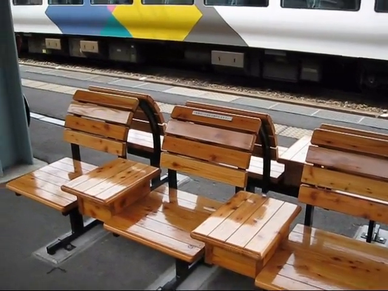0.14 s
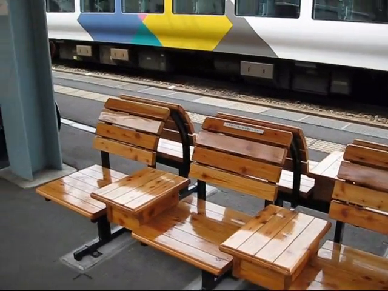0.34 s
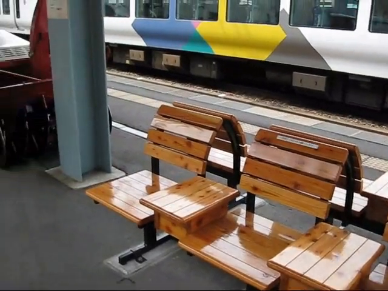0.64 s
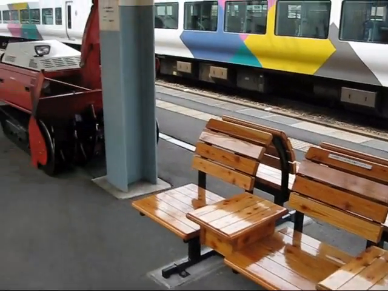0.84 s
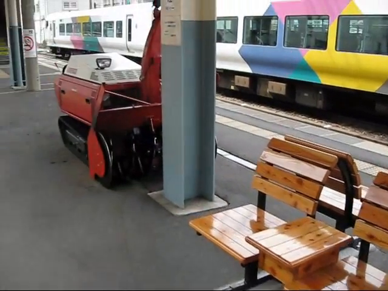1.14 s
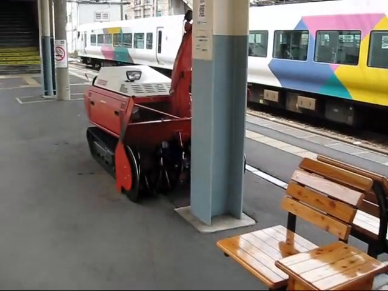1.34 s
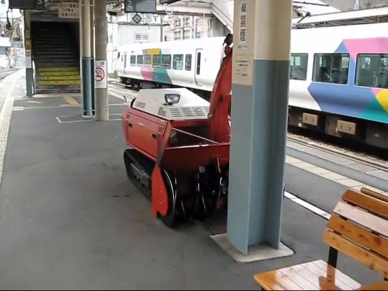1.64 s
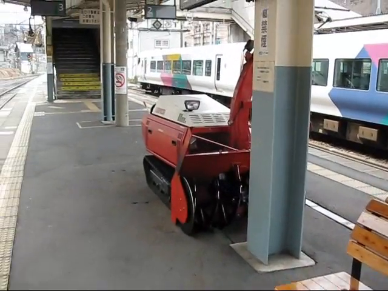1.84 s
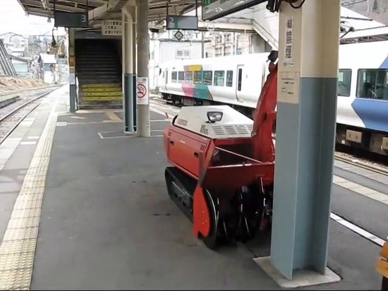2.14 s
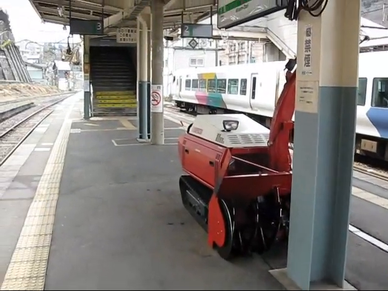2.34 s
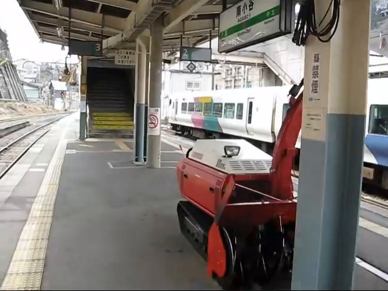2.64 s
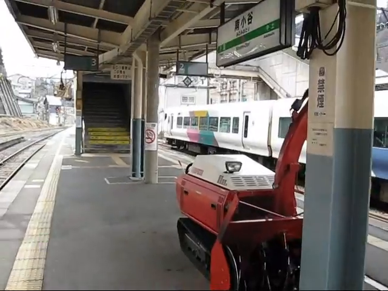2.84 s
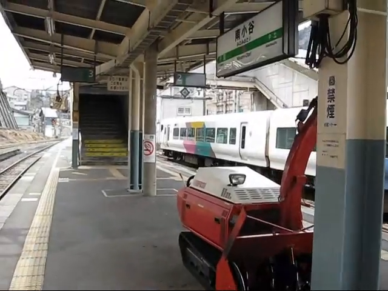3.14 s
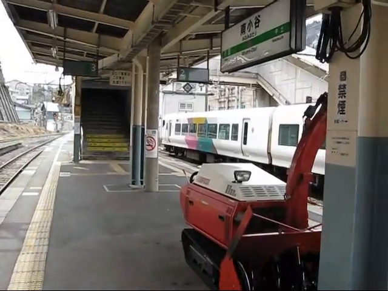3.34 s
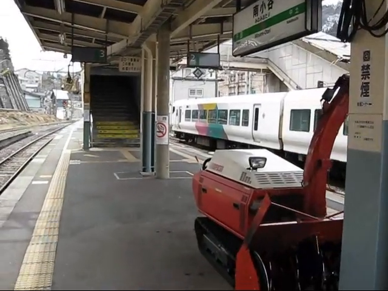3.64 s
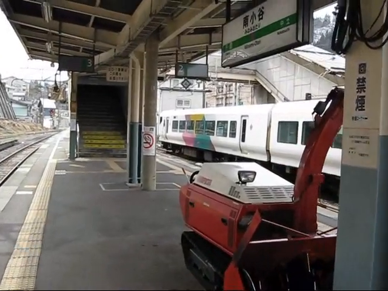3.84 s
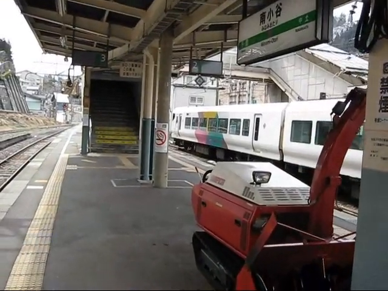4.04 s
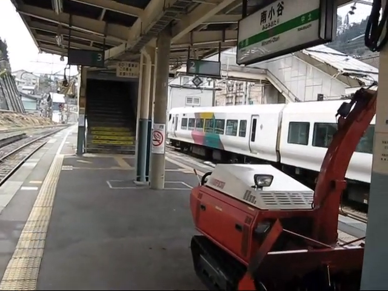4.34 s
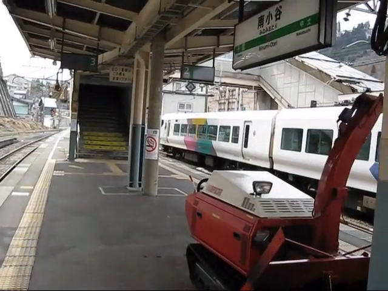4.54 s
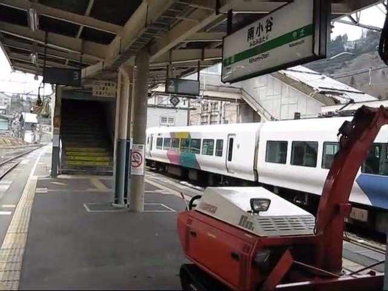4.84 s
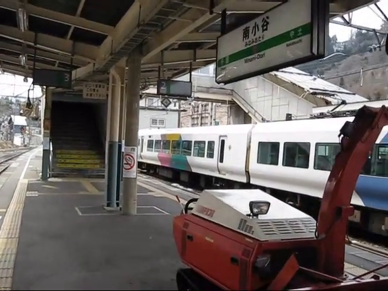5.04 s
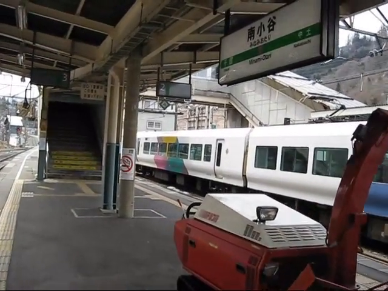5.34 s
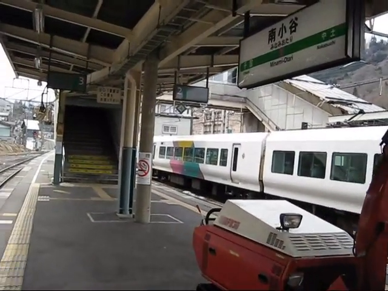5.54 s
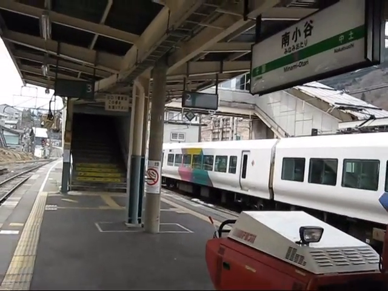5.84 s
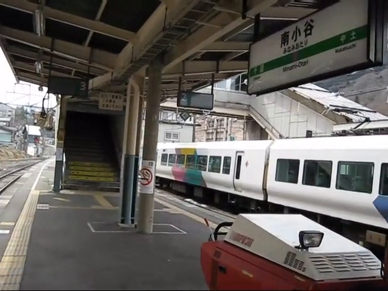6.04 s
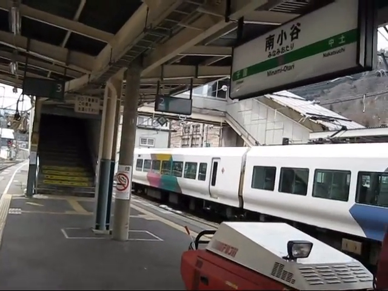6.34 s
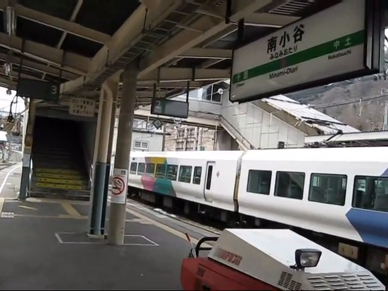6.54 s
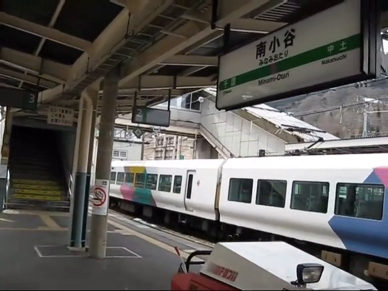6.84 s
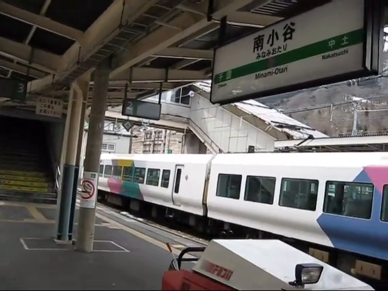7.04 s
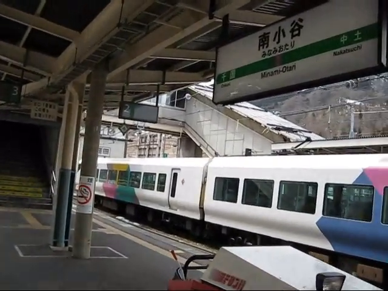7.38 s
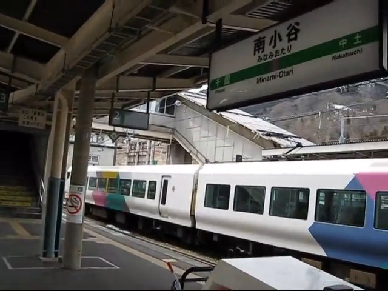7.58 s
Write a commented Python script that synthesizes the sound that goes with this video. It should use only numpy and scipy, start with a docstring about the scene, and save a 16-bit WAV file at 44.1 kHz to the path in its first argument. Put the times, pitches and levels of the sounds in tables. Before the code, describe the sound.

An electric train stands at a roofed open-air platform, its equipment running throughout. A piercing whine around three kilohertz flutters and swells irregularly, over a pulsing low hum and broad rushing blower air. Faint bird twitters come and go far away. A small handheld camera slowly turns from the nearest car, slightly dulling the sound and adding two barely audible ticks.

```python
"""A beating electric hum and whine stands over the roar of cooling blowers, with faint birds far off.
An electric train waits at a roofed platform; a small camera slowly turns away from its nearest car.
Converters under several cars sound sine tones and narrow humps near multiples of the mains, out of step.
Shaped noise gives blower air, blade tones and distant rumble; short falling notes with echoes give
the birds; brief high rings give faint ticks in the camera body."""
import sys
import numpy as np
from scipy import signal
from scipy.fft import rfft, irfft
from scipy.io import wavfile
from scipy.ndimage import uniform_filter1d

SR = 44100
rng = np.random.default_rng(int(sys.argv[2]) if len(sys.argv) > 2 else 0)


def waveform_to_disk(signal):
    """Save audio, clipped to [-1, 1], as 16-bit WAV at the path in sys.argv[1]."""
    frames = np.transpose(np.atleast_2d(signal))
    scaled = np.clip(frames, -1, 1) * 32767
    samples = np.round(scaled).astype(np.int16)
    wavfile.write(sys.argv[1], SR, samples)


N = 340002
T = np.arange(N) / SR
MAINS_HZ = 60


def undb(db):
    """Turn decibels into an amplitude factor."""
    return 10 ** (np.asarray(db) / 20)


def walk(rate_hz):
    """Smooth random drift: levels held 1 / rate_hz seconds and slewed twice, spread about 0.7."""
    hold = int(SR / rate_hz)
    steps = np.repeat(rng.standard_normal(N // hold + 1), hold)
    slewed = uniform_filter1d(uniform_filter1d(steps, hold), hold)
    return 0.97 * slewed[:N]


def coloured(gain):
    """Noise whose amplitude density (per root Hz) follows gain(hz)."""
    hz = np.arange(1, N // 2 + 2) * SR / N
    white = rfft(rng.standard_normal(N))
    return irfft(white * gain(hz) * np.sqrt(SR / 2), N)


def loud_tones(orders, table, wander, partner=0., partner_hz=4.):
    """Swelling tones of wandering pitch; a second car a few Hz above beats against each one."""
    time_s, *levels_db = np.transpose(table)
    out = 0
    for order, level_db in zip(orders, levels_db):
        pitch_hz = order * MAINS_HZ * (1 + wander * walk(3))
        turns = np.cumsum(pitch_hz) / SR + rng.random()
        apart = np.cumsum(partner_hz * (1 + .4 * walk(1.6))) / SR + rng.random()
        pair = np.sin(2 * np.pi * turns) + partner * np.sin(2 * np.pi * (turns + apart))
        # the pair together has the rms level of the table
        swell = np.sqrt(2 / (1 + partner ** 2)) * np.interp(T, time_s, undb(level_db))
        out = out + swell * pair
    return out


# Loudest whine, swelling and fading as the cars beat.
# WHINE_ORDERS: order [mains multiples]; WHINE: time_s [s], then a level_db [dB rms] for each order
WHINE_ORDERS = [52, 56]
WHINE = [(0.0, -47, -37), (0.08, -44, -37), (0.4, -41, -44), (0.52, -41, -45), (0.64, -43, -60),
         (0.92, -53, -40), (1.08, -48, -41), (1.24, -50, -47), (1.52, -49, -46), (1.64, -52, -49),
         (1.8, -43, -44), (2.0, -49, -50), (2.28, -47, -60), (2.36, -62, -43), (2.48, -41, -37),
         (2.56, -40, -46), (2.6, -44, -48), (2.68, -52, -37), (2.8, -42, -47), (2.88, -44, -59),
         (2.96, -41, -42), (3.04, -50, -53), (3.12, -43, -50), (3.24, -60, -47), (3.36, -40, -54),
         (3.44, -54, -44), (3.56, -44, -50), (3.68, -47, -39), (3.76, -55, -43), (3.84, -46, -47),
         (3.92, -60, -56), (3.96, -44, -56), (4.04, -46, -43), (4.12, -62, -47), (4.24, -51, -42),
         (4.36, -62, -46), (4.52, -50, -45), (4.6, -48, -58), (4.68, -49, -38), (4.76, -51, -49),
         (4.84, -43, -46), (4.92, -60, -42), (4.96, -62, -50), (5.04, -40, -52), (5.16, -50, -51),
         (5.24, -45, -52), (5.32, -53, -41), (5.36, -46, -44), (5.44, -56, -51), (5.48, -48, -42),
         (5.56, -46, -51), (5.64, -54, -38), (5.72, -48, -43), (5.76, -48, -38), (5.84, -42, -50),
         (6.04, -49, -40), (6.12, -45, -56), (6.24, -52, -44), (6.32, -40, -47), (6.4, -52, -43),
         (6.48, -44, -60), (6.56, -51, -44), (6.68, -53, -56), (6.72, -43, -45), (6.8, -46, -59),
         (6.84, -46, -45), (6.96, -44, -60), (7.08, -46, -58), (7.2, -43, -40), (7.28, -57, -50),
         (7.36, -43, -39), (7.4, -59, -45), (7.48, -44, -39), (7.56, -46, -51), (7.64, -48, -37),
         (7.7, -46, -42)]
# Side tones of the whine: time_s [s], level_db of multiple 54 [dB rms], level_db of multiple 78 [dB rms]
SIDE = [(0.0, -57, -60), (0.24, -55, -52), (0.6, -49, -66), (0.84, -51, -45), (1.04, -68, -63),
        (1.12, -63, -46), (1.28, -56, -66), (1.36, -68, -51), (1.52, -49, -68), (1.64, -66, -67),
        (1.8, -43, -73), (2.2, -56, -63), (2.32, -46, -59), (2.48, -58, -56), (2.68, -47, -59),
        (2.8, -57, -66), (2.92, -49, -63), (3.12, -67, -73), (3.32, -58, -50), (3.4, -56, -68),
        (3.52, -46, -50), (3.6, -67, -56), (3.76, -48, -56), (3.84, -52, -63), (4.04, -50, -56),
        (4.2, -66, -56), (4.32, -53, -66), (4.72, -50, -54), (4.8, -68, -62), (4.96, -51, -60),
        (5.16, -49, -52), (5.24, -66, -55), (5.32, -45, -60), (5.48, -64, -54), (5.56, -48, -56),
        (5.64, -68, -57), (5.72, -47, -61), (5.8, -56, -66), (5.88, -46, -73), (6.08, -49, -53),
        (6.16, -66, -62), (6.24, -49, -59), (6.4, -61, -63), (6.48, -46, -63), (6.6, -46, -59),
        (6.68, -56, -56), (6.88, -53, -55), (7.04, -68, -57), (7.12, -48, -59), (7.24, -55, -56),
        (7.48, -52, -66), (7.7, -68, -54)]
# Upper side tones: time_s [s], level_db of multiple 82 [dB rms], level_db of multiple 84 [dB rms]
UPPER = [(0, -54, -57), (.36, -56, -50), (.56, -68, -54), (.8, -52, -61), (1.24, -62, -59),
         (1.92, -73, -57.5), (2.28, -56.5, -74), (2.4, -70, -58), (2.64, -60, -56), (2.96, -58, -62),
         (3.48, -64, -57), (3.88, -53, -58), (4.2, -61, -62), (4.64, -53, -61), (4.88, -59, -66),
         (5.28, -61, -66), (5.88, -62, -60), (6.32, -56, -62), (6.52, -56, -59), (7, -57, -59),
         (7.44, -60, -60), (7.7, -56, -57)]


def converter_whine():
    """Strong converter multiples between 3 and 5.1 kHz; the side tones beat with a second car."""
    whine = loud_tones(WHINE_ORDERS, WHINE, wander=.0005)
    whine += loud_tones([54, 78], SIDE, wander=.0004, partner=.15, partner_hz=6.5)
    whine += loud_tones([82, 84], UPPER, wander=.000383, partner=.48, partner_hz=7.)
    return whine


# Slower swells of the low hum.
# HUM_ORDERS: order [mains multiples]; HUM: time_s [s], then a level_db [dB rms] for each order
HUM_ORDERS = [4, 24]
HUM = [(0, -42, -50), (.32, -51, -48.5), (.56, -45, -47.5), (.96, -47, -46), (1.12, -45, -51),
       (1.32, -64, -61), (1.44, -47.5, -64), (1.92, -57, -53), (2.36, -53, -62), (2.76, -54, -50),
       (3.16, -48.5, -68), (3.6, -63, -56), (3.96, -46.5, -55), (4.08, -57, -53.5), (4.96, -60, -50),
       (5.08, -48.5, -56), (5.24, -62, -50), (5.56, -52.5, -47.5), (6.36, -54, -55), (6.56, -47, -62),
       (6.68, -57, -51), (7.24, -54, -53), (7.36, -46.5, -54), (7.7, -62, -50.5)]


def converter_hum():
    """Low mains multiples from two cars, beating about four times a second."""
    return loud_tones(HUM_ORDERS, HUM, wander=.0005, partner=.34, partner_hz=4.)


# How far each car's converter runs off the nominal rate: detune [share of the pitch]
DETUNE = [-.00105, -.0004, .0002, .0007, .0012]
# Weaker converter tones: order [mains multiples], and level_db before the camera's turn [dB rms]
ORDERS = [6, 8, 16, 26, 30, 32, 48, 50, 53, 55, 58, 60, 62, 64, 72, 76, 79, 80, 83, 86, 100, 102, 103, 104,
          106, 108, 110, 112, 114]
ORDERS_DB = [-56, -59, -53, -62, -60, -60, -54, -61, -66, -64, -63, -63, -68, -68, -73, -66, -72, -68, -73,
             -72, -78, -68, -79, -67, -65, -66, -71, -73, -76]
# The same in the high treble: order [mains multiples], and level_db before the turn [dB rms]
HIGH_ORDERS = [126, 128, 130, 132, 134, 136, 156, 162, 164, 166, 170, 180, 182, 210]
HIGH_ORDERS_DB = [-83, -70, -68, -66, -73, -80, -76, -81, -76, -82, -83, -80, -82, -81]


def weak_tones(waver=.00006, blur_hz=.6):
    """Every car sounds each tone with its own strength and a slight waver; the sum beats unevenly."""
    # the other even multiples in the treble sound faintly
    faint_orders = [k for k in range(138, 214, 2) if k not in HIGH_ORDERS]
    orders = ORDERS + HIGH_ORDERS + faint_orders
    levels_db = ORDERS_DB + HIGH_ORDERS_DB + [-87.5] * len(faint_orders)
    spectrum = np.zeros(N // 2 + 1, complex)
    near = np.arange(-40, 41)  # spectrum bins around each tone
    for order, level_db in zip(orders, levels_db):
        # high tones die with distance: the cars furthest off the nominal rate drop out of them
        reach = np.exp(-(np.array(DETUNE) * order * MAINS_HZ / 7) ** 2)
        shares = reach * rng.uniform(0.63, 0.87, len(DETUNE))
        for detune, share in zip(DETUNE, shares / shares.sum()):
            centre = order * MAINS_HZ * (1 + detune) * N / SR
            width = blur_hz * N / SR + waver * centre
            hump = np.exp(-.5 * (near / width) ** 2)
            # random phases spread the waver over time; the hump keeps unit energy
            hump = hump * np.exp(2j * np.pi * rng.random(len(near))) / np.sqrt(np.sum(hump ** 2))
            spectrum[int(centre) + near] += np.sqrt(2 * share) * undb(level_db) * hump * N / 2
    return irfft(spectrum, N)


# Air roar of the blowers before the camera's turn: pitch_hz [Hz], level_db [dB per Hz]
ROAR = [(20, -83.5), (60, -84), (130, -72), (300, -71), (500, -71.5), (800, -71), (1100, -71.5),
        (1500, -74.5), (2500, -76.5), (4000, -83), (5200, -88), (5500, -90.5), (7200, -96.5), (8500, -99),
        (13000, -100)]


def blower_roar():
    """Rushing air: broad noise whose colour runs straight between points on a log pitch scale."""
    pitch_hz, level_db = np.transpose(ROAR)
    return coloured(lambda hz: undb(np.interp(np.log(hz), np.log(pitch_hz), level_db)))


# Blade tones smeared by turbulence, before the turn: pitch_hz [Hz], width_hz [Hz], level_db [dB rms]
BLADES = [(57, 12, -64), (300, 20, -62), (625, 10, -61), (636, 6, -52), (721, 6, -56), (734, 8, -53),
          (756, 7, -51), (805, 6, -59), (953, 8, -58), (976, 7, -55), (1040, 15, -63), (1708, 12, -61),
          (1953, 14, -63), (2437, 14, -65)]


def blade_tones():
    """Blower blades passing: narrow bell-shaped humps of noise, their powers added."""
    def gain(hz):
        power = 0
        for pitch_hz, width_hz, level_db in BLADES:
            bell = np.exp(-2 * ((hz - pitch_hz) / width_hz) ** 2)
            power = power + undb(2 * level_db) / (width_hz * np.sqrt(np.pi / 2)) * bell
        return np.sqrt(power)
    return coloured(gain)


# The camera turns from the nearest car: time_s [s], bass_db [dB gain], treble_db [dB gain],
# blades_db [dB gain], rumble_db [dB rms]
TURN = [(0, -0.5, 3.5, 4.5, -64), (.6, 3.5, 3, 0.5, -72), (1.2, -0.5, 1.5, 0.5, -57),
        (1.6, 1.5, 1.6, .1, -71), (2.5, 0.5, 0.1, 1.7, -63), (3.1, -0.5, 0.8, 5.5, -64),
        (3.7, 0.5, 0.9, 0.7, -65), (4.5, 1.8, 1.3, 1.3, -59), (5.5, 1, 0.8, -0.4, -59),
        (6.5, .1, 0.2, 3.6, -64), (7.71, 1.5, 1.1, -2.5, -61)]


def train_as_camera_turns():
    """Blowers and weak tones, with bass, treble and blade tones shaded by the turn."""
    time_s, *columns = np.transpose(TURN)
    bass_db, treble_db, blades_db, _ = (np.interp(T, time_s, c) for c in columns)
    converters = weak_tones()
    steady = blower_roar() + undb(blades_db) * blade_tones() + converters
    bass = signal.sosfiltfilt(signal.butter(1, 220, fs=SR, output="sos"), steady)
    treble = signal.sosfiltfilt(signal.butter(1, 2500, "high", fs=SR, output="sos"), steady)
    middle = steady - bass - treble
    # gusts under the roof make bass and treble drift a little
    bass_gain = undb(bass_db + 0.82 * walk(6.5))
    treble_gain = undb(treble_db + 1.1 * walk(5.4))
    return bass_gain * bass + treble_gain * treble + middle


def rumble():
    """Low distant rumble: noise around 28 to 65 Hz, its level following the camera's turn."""
    band = signal.butter(2, [28, 65], "bandpass", fs=SR, output="sos")
    low = signal.sosfilt(band, rng.standard_normal(N))
    time_s, *_, rumble_db = np.transpose(TURN)
    return undb(np.interp(T, time_s, rumble_db)) * low / low.std()


# Far bird twitter: start_s [s], length_s [s], pitch_hz [Hz],
# level_db [dB rms at a note's peak, before scatter and echo]
TWITTER = [(.19, .05, 4400, -55), (.96, .19, 5100, -51), (4.2, .3, 5080, -58), (4.55, .28, 4990, -56),
           (5.25, .11, 4650, -54), (6.2, .27, 5070, -55), (6.5, .15, 4950, -60)]


def twitter(rate_hz=70, scatter=.013, glide=-.02, note_s=.01, echo_s=.045):
    """Quick falling notes of uneven pitch and size, smeared by echoes on their way."""
    out = np.zeros(N + SR)
    t = np.arange(int(4 * note_s * SR)) / SR
    shape = np.exp(-((t - 2 * note_s) / note_s) ** 2 * 2)
    fall = 1 + glide * (t / (4 * note_s) - 1)
    for start_s, length_s, pitch_hz, level_db in TWITTER:
        for j, (late, off, size) in enumerate(rng.standard_normal((40, 3))):
            at_s = (j + .3 * late) / rate_hz
            if 0 <= at_s <= length_s:
                note = np.sin(2 * np.pi * pitch_hz * (1 + scatter * off) * t * fall)
                i = int((start_s + at_s) * SR)
                out[i:i + len(t)] += np.sqrt(2) * undb(level_db + 2 * size) * shape * note
    # echoes: a decaying noise tail of unit energy
    tail = rng.standard_normal(SR // 4) * np.exp(-np.arange(SR // 4) / SR / echo_s)
    return signal.fftconvolve(out, tail / np.sqrt(np.sum(tail ** 2)))[:N]


# Faint ticks in the camera body: start_s [s], level_db of the ring as it starts to decay [dB], pitch_hz [Hz]
TICKS = [(3.1803, -45, 11300), (6.3481, -47, 11900)]


def ticks(ring_s=.0015):
    """Each tick is a very short high ring, dying away exponentially."""
    out = np.zeros(N)
    t = np.arange(int(.01 * SR)) / SR
    for start_s, level_db, pitch_hz in TICKS:
        i = int(start_s * SR)
        out[i:i + len(t)] += undb(level_db) * np.exp(-t / ring_s) * np.sin(2 * np.pi * pitch_hz * t)
    return out


def scene():
    """The train on the platform, the far birds and the camera's own ticks, added together."""
    train = train_as_camera_turns()
    tones = converter_whine() + converter_hum()
    return (train + tones + rumble() + twitter() + ticks())[None]


def record(dry, notch_hz=(7440, 8236), notch_db=-38, top_hz=12790):
    """The camera cuts a deep notch near 8 kHz and everything over the top."""
    notch = signal.butter(2, notch_hz, "bandstop", fs=SR, output="sos")
    notched = signal.sosfiltfilt(notch, dry)
    # a little of what the notch removes still leaks through
    notched = notched + undb(notch_db) * (dry - notched)
    top_cut = signal.ellip(16, .3, 70, top_hz, fs=SR, output="sos")
    return signal.sosfilt(top_cut, notched)


dry = scene()
out = record(dry)
waveform_to_disk(out)
```